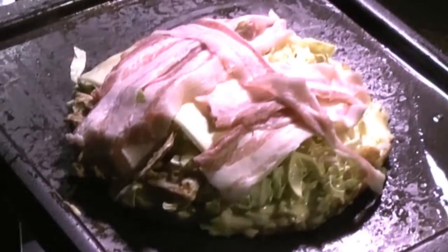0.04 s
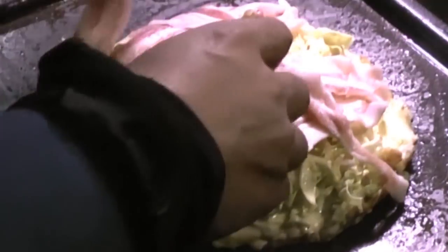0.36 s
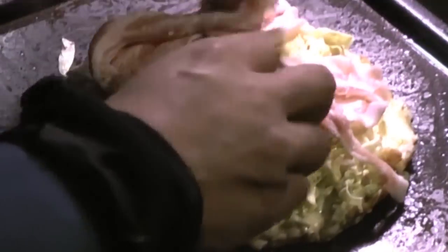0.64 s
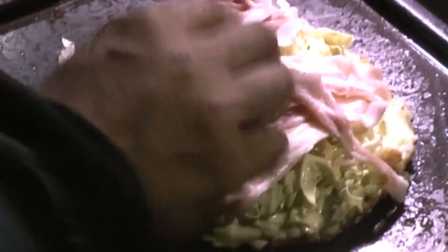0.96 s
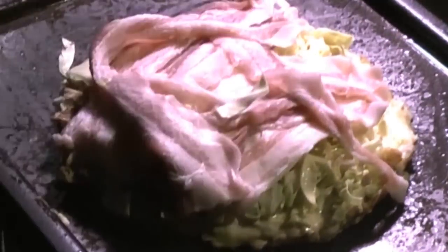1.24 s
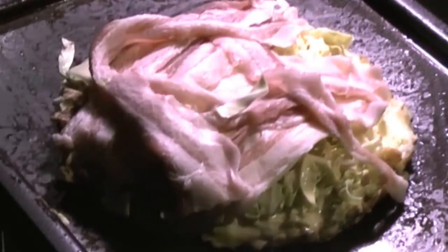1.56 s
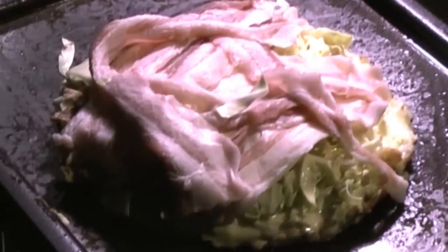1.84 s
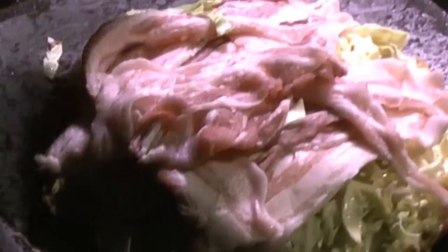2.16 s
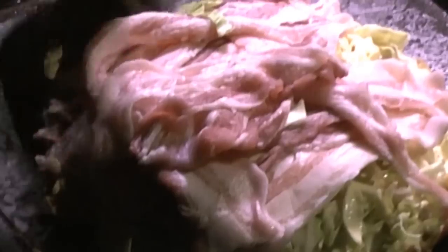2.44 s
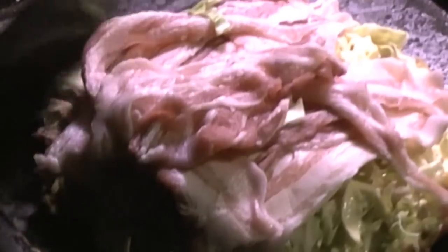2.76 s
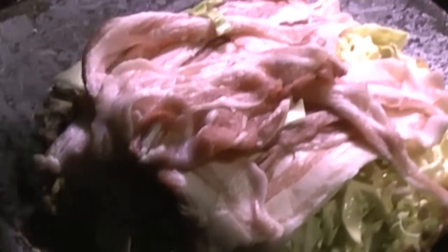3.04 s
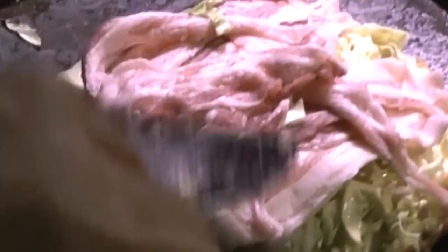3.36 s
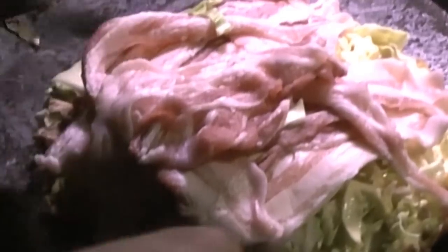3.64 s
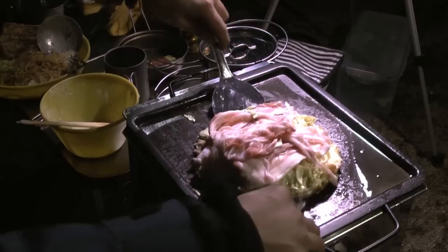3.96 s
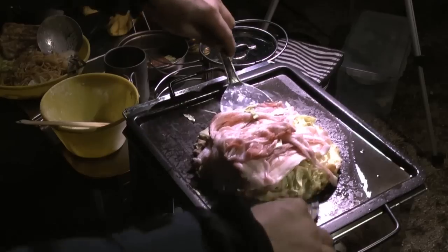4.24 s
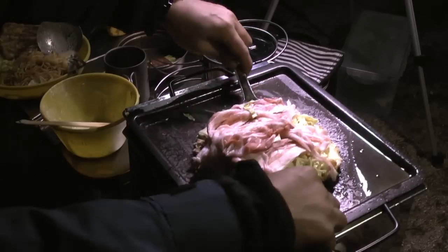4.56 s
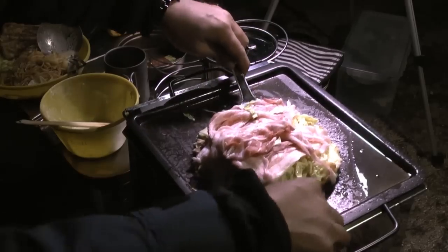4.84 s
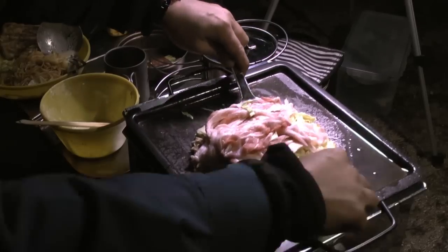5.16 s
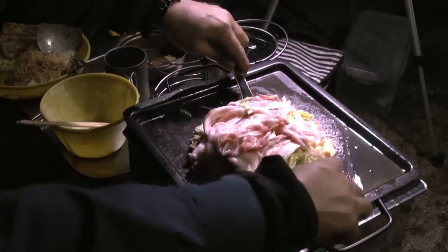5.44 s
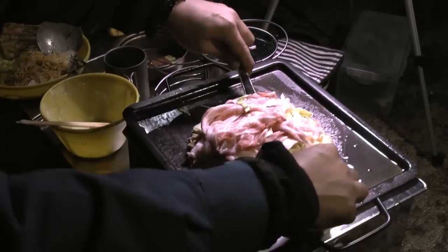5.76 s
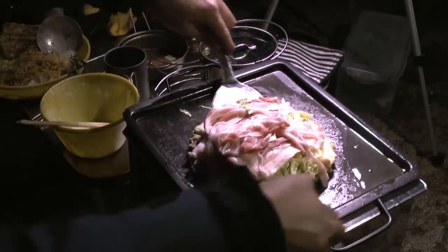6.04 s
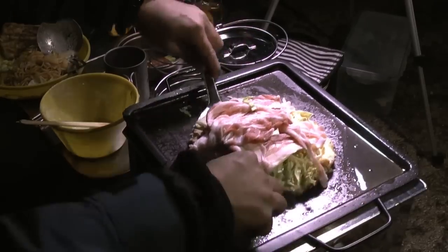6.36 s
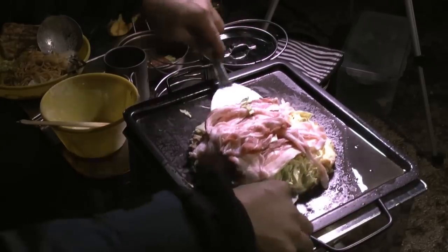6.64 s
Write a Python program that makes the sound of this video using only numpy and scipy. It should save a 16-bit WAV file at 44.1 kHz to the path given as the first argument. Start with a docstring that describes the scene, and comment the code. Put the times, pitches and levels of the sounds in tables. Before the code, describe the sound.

A cabbage pancake sizzles softly on an iron griddle throughout, close and outdoors, with scattered spits of fat over a low steady rumble. From about 1.3 to 2 seconds something is dragged aside with a rough, hollow, catching rattle, the loudest event, trailing into faint rubbing. Between 2.4 and 2.9 seconds steel spatulas clack on the plate and give two short scrapes. A double clack near 3.8 seconds leads into a scrape, a sharp spit and a surge of hiss as wet batter meets hot iron. The sizzle flares again around 4.8 and 5.4 seconds among light scraping strokes. Another knock lands at 5.8 seconds and a ringing clack at 6.4, while quick metallic scrapes continue until about 6.7 seconds over the frying.

```python
"""A pork-topped cabbage pancake sizzles on an iron griddle: steam bubbles hiss, fat spits.
Something is dragged aside with a rough stick-slip rattle. Steel spatulas then clack on the plate
and scrape under the batter, and the wet underside hisses up where it meets fresh hot iron.
Outdoors, close, over a low steady rumble."""
import sys
import numpy as np
from scipy.fft import rfft, irfft, next_fast_len
from scipy.io import wavfile
from scipy.ndimage import map_coordinates

SR = 44100
rng = np.random.default_rng(int(sys.argv[2]) if len(sys.argv) > 2 else 0)


def put_to_file(sound):
    """Save the sound as 16-bit audio at rate SR, in the file named by the first command-line argument."""
    columns = np.atleast_2d(sound).T  # one column per channel
    safe = np.clip(columns, -1, 1)
    whole_steps = np.round(safe * 32767)
    wavfile.write(sys.argv[1], SR, whole_steps.astype(np.int16))


N = 299691

# steady frying: (time [s], level [dB])
FRY_LEVEL = [(0, -50.5), (0.7, -55.5), (1.2, -49), (2.2, -49), (3.0, -50.5), (6.8, -46)]
# bursting bubbles: (frequency [Hz], density [dB])
HISS_SPECTRUM = [(700, -36), (1300, -12), (2000, -7), (2900, -3), (4000, -1), (5400, 0.5), (8000, -1.5),
                 (10000, -4), (13000, -10), (16000, -14.5)]
# wet batter on fresh hot iron: (start [s], level [dB], length [s])
BATTER_FLARES = [(3.89, -34.5, 0.5), (4.774, -38, 0.71), (5.414, -40, 0.34), (5.954, -47, 0.21)]


def sizzle():
    """Countless steam bubbles burst as a hiss with sparser crackles; each flare swells both."""
    flares = [amp(db) * held(start_s, length_s, attack_s=0.0089, release_s=0.075, sag_db_per_s=9.5)
              for start_s, db, length_s in BATTER_FLARES]
    heat = np.linalg.norm([curve(FRY_LEVEL)] + flares, axis=0)  # powers add
    hiss = rasp(HISS_SPECTRUM, rate_hz=9000, spread_db=2, depth_db=1.8, spacing_hz=160)
    crackle = rasp(HISS_SPECTRUM, rate_hz=170, spread_db=6, depth_db=3, spacing_hz=700)
    flutter = amp(0.8 * wobble(rate_hz=35))
    return amp(-2) * heat * flutter * (hiss + amp(-5) * crackle)


# bursting fat drops: (time [s], level [dB], pitch [Hz])
FAT_SPITS = [(0.0997, -30, 5600), (0.2204, -34, 6100), (0.3506, -36, 7200), (0.523, -36, 6400),
             (0.835, -35.5, 6900), (0.852, -33.5, 7700), (0.9971, -33, 5800), (1.1188, -28.5, 7200),
             (1.176, -36, 6500), (2.142, -33.5, 6760), (2.3535, -31, 8000), (3.081, -28, 2700),
             (3.368, -33.5, 5800), (3.450, -33, 9700), (3.974, -21, 4960), (4.682, -32.5, 5700),
             (5.4182, -31, 4400), (5.468, -27, 6340), (5.6082, -25.5, 5660)]


def spits():
    """Fat drops burst, each a sharp snap and a brief spray; fainter ones patter at random."""
    out, t = np.zeros(N), np.arange(2048) / SR
    faint = [(when * N / SR, -51 + 10 * size ** 2, 3500 * 2 ** (1.6 * pitch))
             for when, size, pitch in rng.random(size=(130, 3))]
    for time_s, db, hz in list(FAT_SPITS) + faint:
        band = noise(lambda f: resonance(hz, 0.8 * hz)(f) ** 2, size=len(t))
        spray = band * (fade(t, t60_s=0.011) + amp(-5.5) * fade(t, t60_s=0.054))
        snap = np.sin(2 * np.pi * hz * t) * np.exp(-hz * t / 2)
        add(out, time_s, amp(db - 1.5) * (snap + amp(-2.5) * spray))
    return out


# crowded steel modes: (frequency [Hz], density [dB])
CLACK_SPECTRUM = [(250, -64), (450, -9.5), (1400, -1), (2500, -4), (3300, -2.5), (5000, -2), (8500, -3),
                  (11000, -9), (15500, -22)]
# spatula and plate in contact: (frequency [Hz], level [dB], t60 [s])
STEEL_MODES = [(505, -2, .08), (610, -6, .07), (890, -6, .07), (1080, -8, .06), (1335, -3, .1),
               (1500, -4, .08), (1720, -8, .06), (1980, -11, .07), (2210, -11, .07), (3000, -5, .06),
               (3360, -4, .08), (4102, -7, .1), (4840, -6, .07), (5510, -9, .06), (6430, -10, .06),
               (7990, -10, .08), (8780, -10, .07), (10000, -14, .06)]


def clack(t, t60_s, treble_db):
    """Steel on iron: crowded modes decay as noise, with distinct modes ringing among them."""
    tilt = treble(treble_db)
    fine = ripple(depth_db=4.5, spacing_hz=80)
    dense = noise(lambda f: shape(CLACK_SPECTRUM)(f) * tilt(f) * fine(f), size=len(t))
    modes = np.zeros(len(t))
    for hz, db, mode_t60_s in STEEL_MODES:
        gain = amp(db + rng.normal(0, 2)) * tilt(hz)
        modes += gain * np.sin(2 * np.pi * (hz * t + rng.random())) * fade(t, mode_t60_s)
    return dense * (fade(t, t60_s) + amp(-5) * fade(t, t60_s=0.033)) + amp(-6) * modes


def plate_knock(t, hz):
    """The batter damps the plate, so its knock is dull and short."""
    boom = noise(lambda f: resonance(hz, hz)(f) ** 2, size=len(t)) * fade(t, t60_s=0.038)
    tone = np.sin(2 * np.pi * hz * t) * fade(t, t60_s=0.015)
    return 1.11 * tone + amp(-6.5) * boom


def blade_ring(t, hz):
    """The blade bends in a beating pair of tones, plus a partial three times as high."""
    pair = np.sin(2 * np.pi * hz * t) + np.sin(2 * np.pi * (hz + 55) * t)
    overtone = 0.57 * shape(CLACK_SPECTRUM)(2 * hz) * np.sin(2 * np.pi * 3 * hz * t)
    return (pair + overtone) * fade(t, t60_s=0.11)


def stand_thud(t):
    """The stand shudders, then rocks once with falling pitch as it settles."""
    frame = resonances([(204, 53, 2), (138, 35, 1.3), (439, 43, 1.5)])
    shudder = noise(frame, size=len(t)) * fade(t, t60_s=0.21)
    rock_hz = 88 + 90 * np.exp(-t / 0.039)
    late_pulse = np.exp(-((t - 0.058) / 0.014) ** 2)
    rock = np.sin(2 * np.pi * np.cumsum(rock_hz) / SR) * late_pulse
    return rock + amp(1.5) * shudder


# spatula on plate: (time [s], clack [dB], clack t60 [s], knock [Hz], knock [dB],
#                    clack treble [dB], ring [Hz], ring [dB], thud [dB])
SPATULA_BLOWS = [(2.391, -20.5, 0.082, 924, -19, 1, 3320, -29, -24),
                 (2.549, -32, 0.05, 900, -52, 17, 2970, -23.5, -60),
                 (2.774, -18.5, .07, 940, -13.5, -1, 4790, -31, -24.5),
                 (3.774, -23, 0.24, 600, -36, -4.5, 2340, -22.5, -30.5),
                 (3.836, -21.5, 0.21, 756, -28, -10.5, 2920, -22, -30.5),
                 (5.7626, -17, 0.1, 695, -9, -17, 1397, -23, -70),
                 (6.385, -16.5, 0.14, 730, -9.5, -7, 1352, -17.5, -42),
                 (6.395, -23.5, 0.11, 723, -35, -3, 1369, -16.5, -60)]


def blows():
    """Each spatula blow clacks, knocks the plate, rings the blade and shakes the stand."""
    out, t = np.zeros(N), np.arange(SR // 3) / SR
    for time_s, db, t60_s, knock_hz, knock_db, treble_db, ring_hz, ring_db, thud_db in SPATULA_BLOWS:
        add(out, time_s, amp(db) * clack(t, t60_s, treble_db))
        add(out, time_s, amp(knock_db) * plate_knock(t, knock_hz))
        add(out, time_s, amp(ring_db) * blade_ring(t, ring_hz))
        add(out, time_s, amp(thud_db) * stand_thud(t))
    return out


# blade edge on iron: (frequency [Hz], density [dB])
SCRAPE_SPECTRUM = [(210, -46), (350, -22), (490, 3.5), (696, -7), (1430, -3), (1790, -6), (2580, -4),
                   (3030, -7), (3620, -5), (9900, -9.5), (16000, -27)]
# singing blade: (frequency [Hz], width [Hz], level [dB])
BLADE_MODES = [(500, 69, -10), (1016, 45, -1), (1410, 320, -1), (3004, 99, -1), (3390, 20, 0.5),
               (4900, 33, 0.5), (5440, 69, -4), (7860, 68, -3)]
# hand pushes: (peak time [s], level [dB], rise [s], fall [s], edge treble [dB],
#               song over edge [dB], favoured note [Hz])
SPATULA_STROKES = [(2.558, -31, 0.041, 0.035, 4.5, -8, 2400), (2.864, -35.5, 0.029, 0.038, -1, 1, 3220),
                   (3.98, -33.5, 0.076, 0.12, 1.5, -11.5, 1450), (4.21, -38.5, 0.035, 0.06, 2, -8, 1410),
                   (4.40, -39, 0.088, 0.053, 2, -10, 1480), (4.53, -44, 0.054, 0.052, -4, -12, 1450),
                   (4.93, -45, 0.14, 0.13, -3, -14, 1400), (5.13, -36.5, 0.07, 0.14, 3.5, -7.5, 4900),
                   (5.72, -44, 0.11, 0.091, -3, -10, 1410), (6.06, -37.5, 0.1, 0.14, -3, -5, 1370),
                   (6.24, -38, 0.076, 0.064, 1, 8, 1500), (6.31, -32, 0.053, 0.068, 0, 1, 3250),
                   (6.601, -33, 0.03, 0.016, 3, 0, 1390), (6.662, -30, 0.035, 0.049, 2, 1, 3000)]


def scrapes():
    """The edge rasps over the iron and the blade sings; each stroke has its own metallic colour."""
    out = np.zeros(N)
    for peak_s, db, rise_s, fall_s, treble_db, song_db, note_hz in SPATULA_STROKES:
        edge = rasp(SCRAPE_SPECTRUM, rate_hz=7000, spread_db=3, depth_db=3.4, spacing_hz=100)
        edge = unit(filtered(edge, treble(treble_db)))
        note = resonance(note_hz, 0.13 * note_hz)
        friction = grains(rate_hz=7000, spread_db=0.5)
        song = unit(filtered(friction, lambda f: resonances(BLADE_MODES)(f) * (0.78 + abs(note(f)))))
        blend = (edge + amp(song_db) * song) / np.hypot(1, amp(song_db))
        out += amp(db) * swell(peak_s, rise_s, fall_s) * blend
    chatter = amp(1.1 * wobble(rate_hz=45))
    return amp(3) * out * chatter


# sliding contact: (frequency [Hz], density [dB])
DRAG_SPECTRUM = [(290, -15), (500, -1.5), (649, -6.5), (773, -5), (919, -4.5), (1320, -3.5), (1600, -4.5),
                 (2130, -2.5), (2770, -11.5), (3200, -9), (6140, -15.5), (7210, -21.5), (8330, -18.5),
                 (16000, -39.5)]
# hollow body: (frequency [Hz], width [Hz], level [dB])
BODY_MODES = [(192, 56, -2.5), (400.4, 23.5, 3.5), (800, 58, -11)]
# catches: (time [s], level [dB], t60 [s], hollow note [Hz])
DRAG_JOLTS = [(1.311, -35.5, 0.11, 4530), (1.345, -37, 0.14, 1880), (1.377, -31.5, 0.1, 1890),
              (1.413, -20, 0.11, 2000), (1.446, -9.5, 0.13, 1690), (1.475, -15, 0.16, 1300),
              (1.503, -8.5, 0.046, 2100), (1.550, -19, 0.035, 600), (1.582, -7, 0.054, 1310),
              (1.647, -8.5, 0.059, 1500), (1.684, -14.5, 0.11, 2200), (1.695, -14, 0.14, 1420),
              (1.729, -19.5, 0.13, 1800), (1.765, -16, 0.16, 1310), (1.971, -24.5, 0.049, 2000)]


def drag():
    """One pull: stick-slip grains excite a hollow body; each catch knocks it at another spot."""
    jolts, t = np.zeros(N), np.arange(SR // 4) / SR
    colour = shape(DRAG_SPECTRUM)
    onset = 1 - np.exp(-t / 0.00097)
    for time_s, db, t60_s, hz in DRAG_JOLTS:
        note = resonance(hz, 0.24 * hz)
        knock = noise(lambda f: colour(f) * treble(db=3)(f) * (0.98 + abs(note(f))), size=len(t))
        add(jolts, time_s, amp(db + 1) * knock * fade(t, t60_s) * onset)
    pull = dict(start_s=1.414, length_s=0.45, release_s=0.1, sag_db_per_s=3)
    slips = rasp(DRAG_SPECTRUM, rate_hz=3500, spread_db=3, depth_db=2.2, spacing_hz=70)
    slips = filtered(slips, treble(db=-2)) * held(attack_s=0.015, **pull)
    body = unit(filtered(grains(rate_hz=1600, spread_db=1.5), resonances(BODY_MODES)))
    body *= held(attack_s=0.028, **pull)
    flutter = amp(0.48 * wobble(rate_hz=70))
    return amp(-24) * flutter * slips + amp(-27.5) * body + jolts


# rung by rubbing: (frequency [Hz], width [Hz], level [dB])
RUB_RESONANCES = [(800, 190, 4), (1040, 120, -4), (3160, 67, -2), (4860, 160, -16)]


def rub():
    """Faint resonant friction after the drag, growing until it stops."""
    growth = held(start_s=1.955, length_s=0.49, attack_s=0.02, release_s=0.059, sag_db_per_s=-12)
    return amp(-46) * growth * noise(resonances(RUB_RESONANCES))


# low rumble: (frequency [Hz], density [dB])
RUMBLE_SPECTRUM = [(12, -30), (20, -1.5), (37, -2.5), (65, 0), (119, -2.5), (177, -9), (206, -4.5),
                   (268, -17), (296, -15.5), (362, -18), (400, -17.5), (520, -34), (880, -120)]
# murky rush: (frequency [Hz], density [dB])
RUSH_SPECTRUM = [(150, -16), (250, -4.5), (450, -2.5), (794, -4), (1290, -8.5), (1600, -13.5), (1770, -12),
                 (2500, -17), (3250, -16), (5500, -120)]
# murky rush: (time [s], level [dB])
RUSH_LEVEL = [(0, -48), (0.96, -47.5), (1.4, -42), (2.3, -48), (3.0, -46.5), (3.35, -44.5), (3.7, -48.5),
              (6.8, -47)]


def background():
    """A low rumble and a soft rush, as of the burner under the plate."""
    rumble = noise(shape(RUMBLE_SPECTRUM)) * amp(1.8 * wobble(rate_hz=18))
    rush = curve(RUSH_LEVEL) * noise(shape(RUSH_SPECTRUM))
    return amp(-43.5) * rumble + amp(0.5) * rush


def amp(db):
    """Decibels to gain."""
    return 10 ** (np.asarray(db) / 20)


def unit(x):
    """x at rms 1."""
    return x / np.sqrt(np.mean(x ** 2) + 1e-20)


def add(track, time_s, sound):
    """Mix a sound into the track."""
    target = track[max(round(time_s * SR), 0):][:len(sound)]
    target += sound[:len(target)]


def filtered(x, response):
    """x through a frequency response."""
    size = next_fast_len(len(x) + 8192)
    return irfft(rfft(x, size) * response(np.fft.rfftfreq(size, 1 / SR)), size)[:len(x)]


def shape(points):
    """Response through (frequency [Hz], level [dB]) on a log axis, falling away at both ends."""
    hz, db = np.transpose(points)
    log_hz = np.log(np.r_[hz[0] / 2, hz, hz[-1] * 2])
    return lambda f: amp(np.interp(np.log(f + 1), log_hz, np.r_[-120, db, -120]))


def resonance(hz, width_hz):
    """Causal response of one mode, 1 at its centre."""
    return lambda f: 1j * f * width_hz / (hz * hz - f * f + 1j * f * width_hz)


def resonances(modes):
    """Summed modes: (frequency [Hz], width [Hz], level [dB])."""
    return lambda f: sum(amp(db) * resonance(hz, width_hz)(f) for hz, width_hz, db in modes)


def ripple(depth_db, spacing_hz):
    """Fine random peaks and dips of crowded modes."""
    knots = rng.standard_normal(1024)
    return lambda f: amp(depth_db * np.clip(map_coordinates(knots, [f / spacing_hz], mode="wrap"), -2, 2))


def treble(db):
    """High shelf around 4 kHz."""
    return lambda f: amp(db * f ** 2 / (f ** 2 + 4000 ** 2))


def noise(response, size=N):
    """Coloured noise, rms 1."""
    return unit(filtered(rng.standard_normal(size), response))


def grains(rate_hz, spread_db):
    """Random impulses of log-normal size, rms 1."""
    sizes = amp(spread_db * np.minimum(rng.standard_normal(N), 2.5))
    return unit((rng.random(N) < rate_hz / SR) * sizes * rng.choice([-1, 1], N))


def rasp(spectrum, rate_hz, spread_db, depth_db, spacing_hz):
    """Tiny impacts coloured by a spectrum and crowded modes, rms 1."""
    fine = ripple(depth_db, spacing_hz)
    return unit(filtered(grains(rate_hz, spread_db), lambda f: shape(spectrum)(f) * fine(f)))


def wobble(rate_hz):
    """Smooth curve through random knots."""
    return map_coordinates(rng.standard_normal(4096), [np.arange(N) * rate_hz / SR], mode="wrap")


def curve(points):
    """Gain per sample through (time [s], level [dB])."""
    return amp(np.interp(np.arange(N) / SR, *np.transpose(points)))


def fade(t, t60_s):
    """Fast rise, exponential decay."""
    return amp(-60 * t / t60_s) * (1 - np.exp(-t / 0.0002))


def held(start_s, length_s, attack_s, release_s, sag_db_per_s):
    """Rise, sloping hold, Gaussian release."""
    t = np.maximum(np.arange(N) / SR - start_s, 0)
    rise = 1 - np.exp(-t / attack_s)
    hold = amp(-sag_db_per_s * np.minimum(t, length_s))
    release = np.exp(-(np.maximum(t - length_s, 0) / release_s) ** 2)
    return rise * hold * release


def swell(peak_s, rise_s, fall_s, roundness=1.88):
    """Pressure of one hand push, peak 1; roundness 1 is pointed, 2 a bell."""
    t = np.arange(N) / SR - peak_s
    return np.exp(-abs(t / np.where(t < 0, rise_s, fall_s)) ** roundness)


def scene():
    """All sources close, in open air; mono."""
    return (background() + sizzle() + spits() + drag() + rub() + scrapes() + blows())[None]


def record(dry, ceiling=0.9, top_hz=16000):
    """The microphone rounds off the highest peaks and cuts everything above its band limit."""
    soft = dry / (1 + abs(dry / ceiling) ** 6) ** (1 / 6)
    return np.array([filtered(channel, lambda f: f < top_hz) for channel in soft])


dry = scene()
out = record(dry)
put_to_file(out)
```